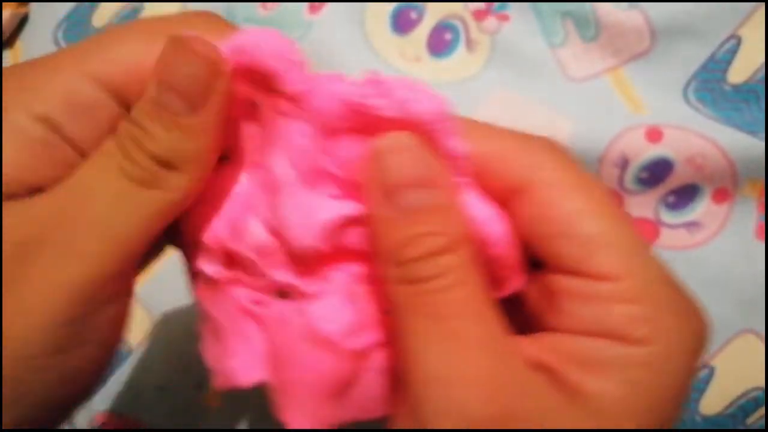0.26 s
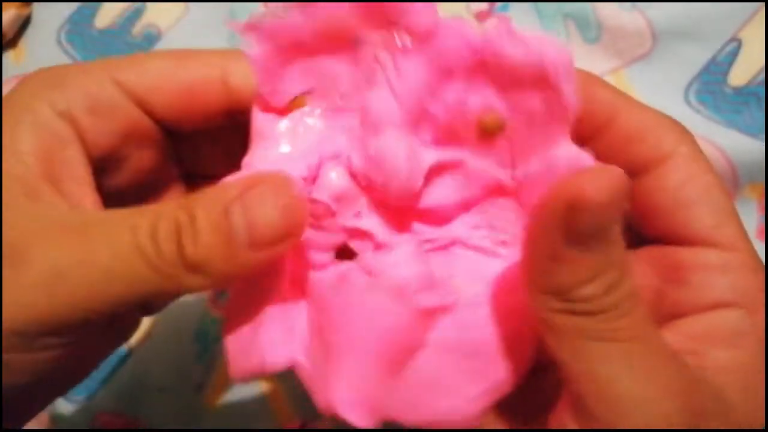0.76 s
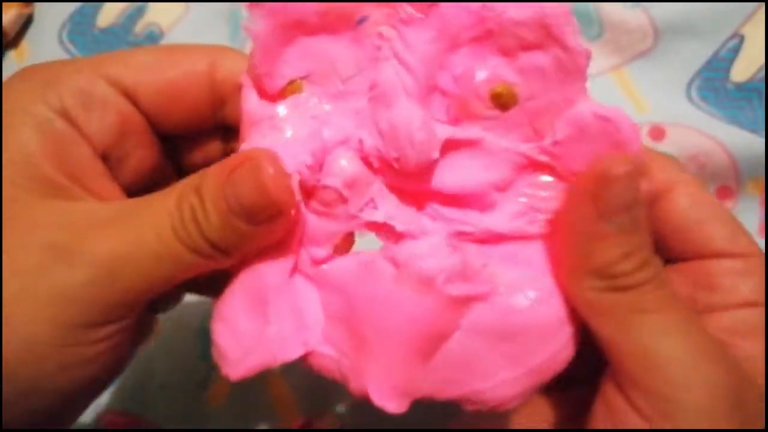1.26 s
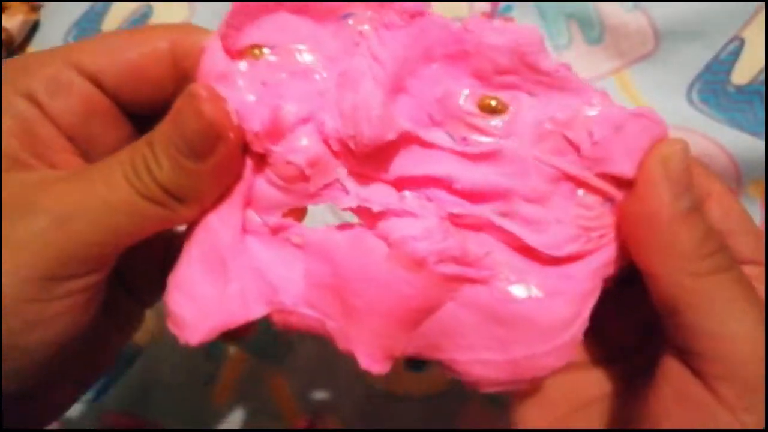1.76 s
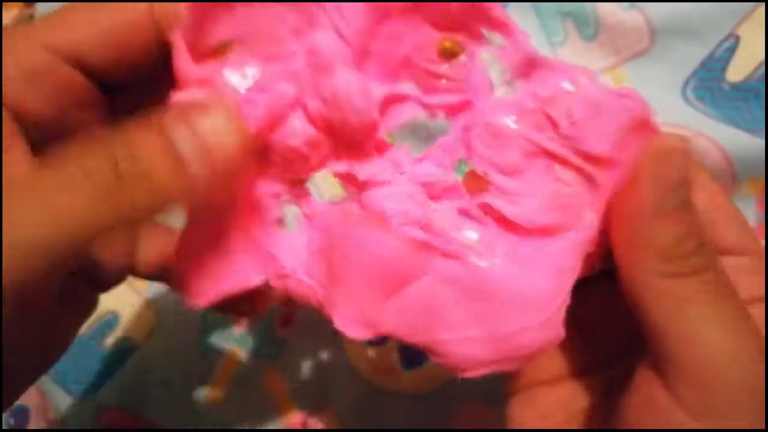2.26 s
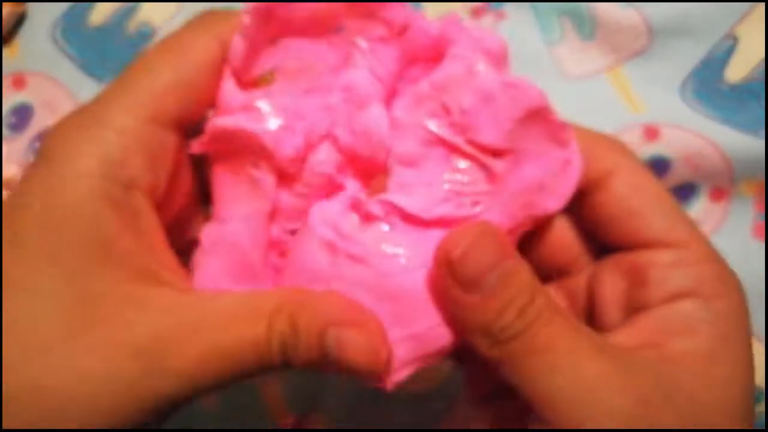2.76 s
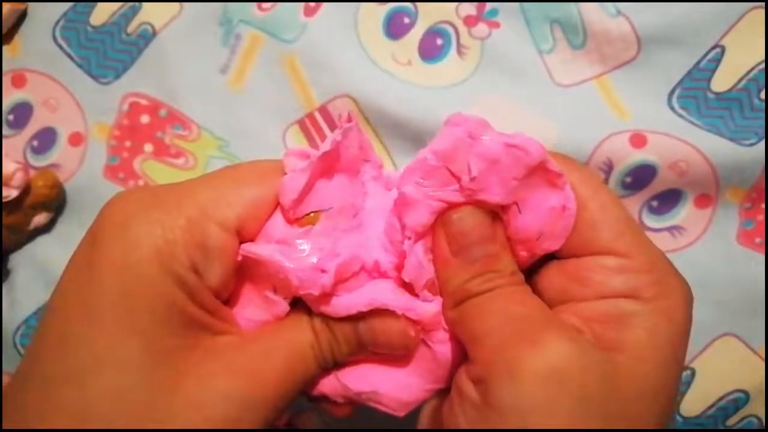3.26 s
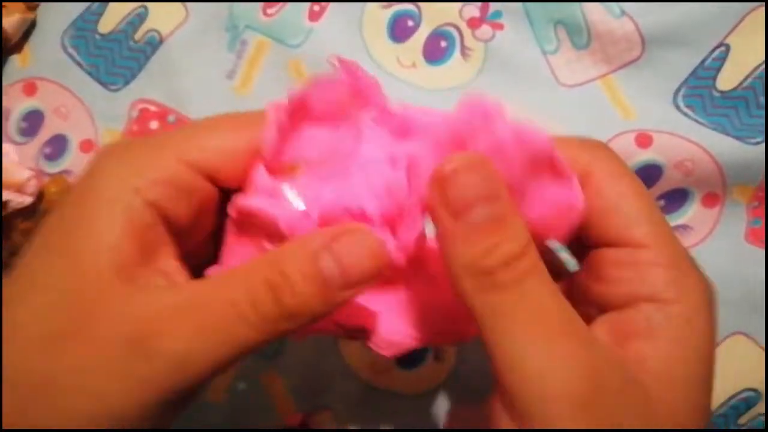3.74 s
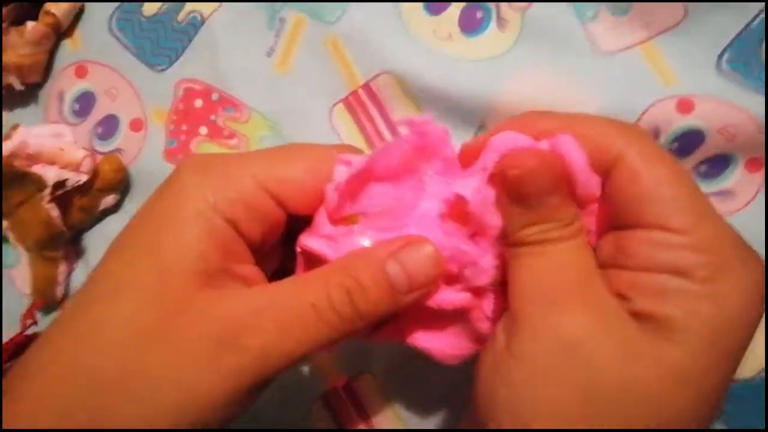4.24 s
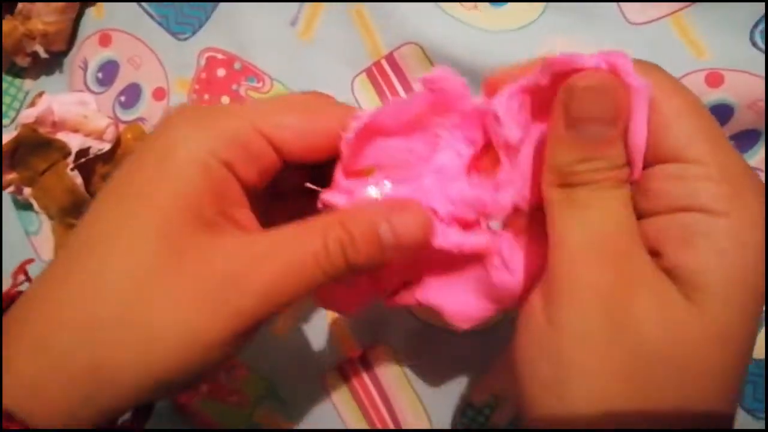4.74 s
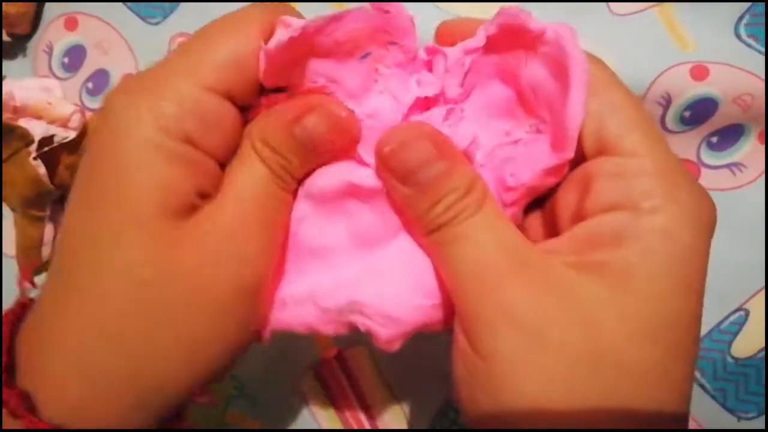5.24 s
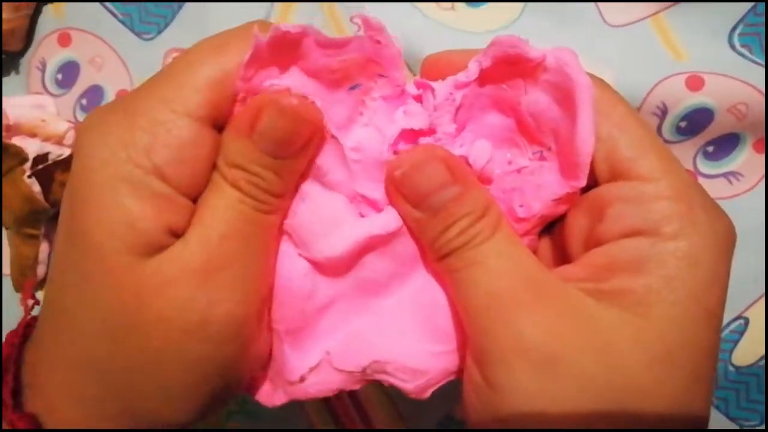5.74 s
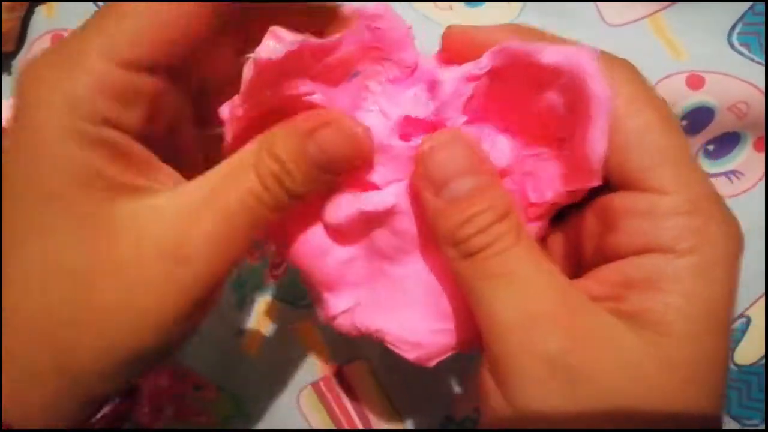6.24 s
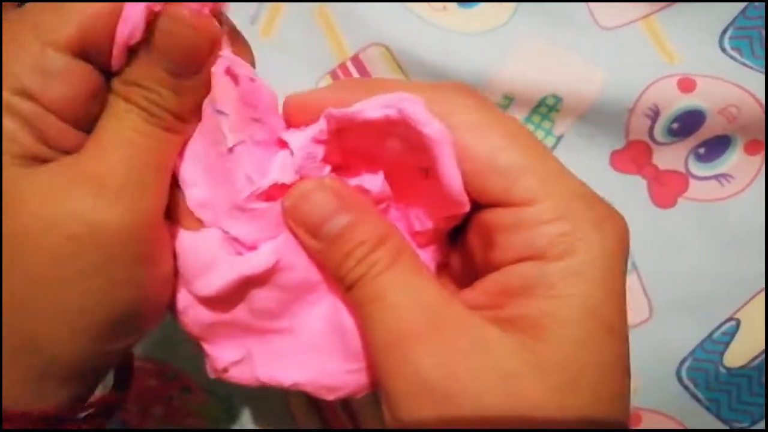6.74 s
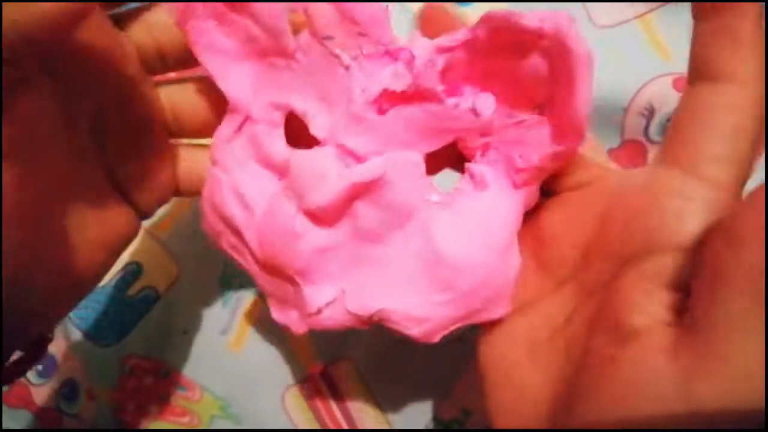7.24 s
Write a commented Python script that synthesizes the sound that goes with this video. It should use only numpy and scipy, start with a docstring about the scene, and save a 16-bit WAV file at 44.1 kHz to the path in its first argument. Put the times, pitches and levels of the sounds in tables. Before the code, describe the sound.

Hands tug and squeeze soft clay with a dried crust, giving sharp tiny snaps and short bursts of dry crackle, very close in a quiet room.

```python
"""Two hands pull and squeeze soft clay with a dried crust, close to a pair of small microphones in a quiet room.
Single snaps are tiny noise bursts that ring each microphone port near 8 kHz and a hollow in the clay.
Clumped random cracks make the dense crackle of each pull; a few soft low jolts mark a sticky seam letting go.
The table top sends back an early echo with a short tail; under it all lie room rumble and microphone hiss,
made of noise in half-octave bands."""
import sys
import numpy as np
from scipy import signal
from scipy.io import wavfile

SR = 44100
rng = np.random.default_rng(int(sys.argv[2]) if len(sys.argv) > 2 else 0)


def inscribe(sig):
    """Save sig as 16-bit PCM at rate SR to the path in sys.argv[1].

    A 1-D sig is mono; a 2-D sig holds one channel per row.
    Samples are clipped to [-1, 1] before scaling.
    """
    pcm = np.round(np.clip(np.atleast_2d(sig).T, -1, 1) * 32767)
    wavfile.write(sys.argv[1], SR, pcm.astype(np.int16))


def gain_from_decibels(decibels):
    """Convert decibel values to linear amplitude factors."""
    exponent = np.asarray(decibels, float) / 20
    return 10 ** exponent


N = 330564

# Room rumble and microphone hiss. Each row: frequency in Hz, relative noise density in dB per Hz.
ROOM_TONE = [(21, -21), (36, -5.5), (75, -11.5), (105, -6.5), (220, -13), (263, -19.5), (1130, -23.5),
             (1280, -18.5), (2190, -25), (8670, -30), (16000, -38.5)]
# How alike the room is at both microphones. Each row: frequency in Hz, left-right correlation (-1 to 1).
ROOM_LIKENESS = [(60, .96), (130, .9), (290, .2), (640, -.3), (1400, 0)]
# The microphone ports, left then right. Each row: ring in Hz, ring width in Hz, skirt width in Hz.
MIC_PORTS = [(7796, 2900, 1400), (8080, 1700, 1600)]
# Pulls and squeezes that tear the crust. Each row: peak time in seconds, length in seconds, fine cracks in dB,
# coarse cracks over fine in dB, coarse brightness in dB per octave over that of the held clay.
CRUST_PULLS = [(0.184, 0.07, -52.5, -3, 2), (0.222, 0.13, -43.5, -10, 0), (0.254, 0.07, -40, -4, -1),
               (0.288, 0.035, -39.5, 2.5, -4), (0.461, 0.068, -61, -1.5, -8.5), (0.744, 0.036, -57, 0, -7),
               (1.338, 0.13, -56, -6, -3), (1.444, 0.38, -73.5, -2, -1), (1.724, 0.03, -46.5, -13, 14),
               (1.767, 0.11, -49.5, -2, -1), (2.192, 0.11, -57.5, -12, -4), (2.25, 0.13, -59.5, -7, -3),
               (2.313, 0.09, -50.5, -6, -4), (2.602, 0.08, -67, -16, 6), (2.984, 0.38, -61, -8, -1),
               (3.11, 0.051, -58, -1.5, -3), (3.33, 0.87, -69.5, -2, -6), (3.536, 0.063, -35, -1.5, -2.5),
               (3.616, 0.16, -56, -5.5, -6), (3.988, 0.051, -56, -10, 0), (4.203, 0.078, -55.5, -3, -1),
               (4.3, 0.69, -65, -6.5, 1), (4.398, 0.035, -58.5, 8, 19), (4.596, 0.26, -64, -3, -9.5),
               (4.699, 0.21, -51, -8, -2), (4.749, 0.13, -53, -15, -14), (4.885, 0.047, -44, 0, -6),
               (5.03, 0.076, -54.5, -19, 2.1), (5.195, 0.31, -59, -2.7, 0.9), (5.269, 0.082, -61, 12, 5.5),
               (5.294, 0.03, -54, 7, 7.5), (5.333, 0.027, -39, -8, -1.5), (5.37, 0.14, -44.5, -10.5, -1),
               (5.459, 0.079, -46, -13.5, -3), (5.933, 0.13, -44, -7.5, -4.5),
               (5.957, 0.058, -38, -5.5, -6.5), (5.979, 0.03, -32.5, -3, -3), (6.014, 0.09, -48, -3, -3.5),
               (6.054, 0.04, -42.5, -1.5, -4), (6.092, 0.04, -56, -5, -10), (6.277, 0.047, -66, 7, 5),
               (6.58, 0.66, -62, -20, 9), (6.651, 0.24, -61.5, -0.5, -1.5), (6.943, 0.077, -57.5, 0, 1),
               (6.99, 0.13, -42, -5.5, -4.7), (7.065, 0.098, -44.5, -5.5, -6),
               (7.447, 0.037, -56, -18, 2.5)]
# Cracks while the clay is only held: fine level in dB, coarse level in dB.
HELD_DB = (-77.5, -78)
# Single snaps of the crust. Each row: start in seconds, peak at the port ring in dB, hollow pitch in Hz,
# hollow over that peak in dB, left over right in dB (a snap uses at most 16 either way).
CRUST_SNAPS = [(0.1009, -47, 1890.0, 7.5, 7), (0.1762, -43, 3920.0, 0, 4.5), (0.2018, -38, 4480.0, -5, 10),
               (0.2085, -37, 3800.0, -12.0, 8), (0.2137, -39, 3400.0, -11, 4),
               (0.2236, -41, 3830.0, -2, 9.5), (0.2465, -21, 4610.0, -15, 10.5),
               (0.2581, -36.5, 1460.0, -2, 11), (0.2657, -37, 4570.0, 0, 12.5),
               (0.2773, -34, 4740.0, 3, 12), (0.2852, -44, 5170.0, 9, 4), (0.2896, -34, 5080.0, 1.5, 8),
               (0.2958, -28.5, 3490.0, 4.5, 7), (0.4748, -35.5, 2450.0, -19, -8.5),
               (0.499, -55, 1450, 7.5, -9), (0.5097, -34.5, 5040.0, -27, 2), (0.735, -42.5, 1460.0, -3, 16),
               (0.7507, -32.5, 4130.0, -13, -8), (0.981, -32, 2370.0, -20.5, -3),
               (1.001, -44.5, 1200.0, -7, 1), (1.2522, -35, 4520.0, -23, 0.5),
               (1.2727, -34.5, 1940.0, -22, 0.0), (1.2828, -35, 4610.0, -21.0, 1.5),
               (1.2922, -27.5, 4520.0, -22, -1.0), (1.3036, -35, 4570.0, -15, -3),
               (1.3201, -30, 4440.0, -25.0, 4), (1.3338, -25.5, 1720.0, -11.5, 1),
               (1.3442, -25.5, 5300.0, -20, 1), (1.354, -37, 2980.0, -17, 3),
               (1.4432, -48.0, 1850.0, -13, 10), (1.5617, -34, 3270.0, -13.5, -8),
               (1.5755, -45, 4870.0, -10.5, -10.5), (1.6366, -30, 1680.0, -22, 4.5),
               (1.7064, -10, 3530.0, -15.5, -9.0), (1.7347, -31, 2800.0, -14, 3),
               (1.739, -13.5, 2710.0, -12.5, -11.5), (1.7536, -10.5, 2630.0, -14.5, -6),
               (1.7539, -45, 750, 3.5, 10), (1.7779, -36, 2890.0, -4, -12), (1.7849, -23, 4690.0, -3.5, -7),
               (1.8049, -45.0, 2330.0, -12, -16.0), (1.8247, -30, 2370.0, -19, -7),
               (2.2423, -43, 5210.0, -12, -7), (2.3114, -41, 2040, 4, -4), (2.3117, -26, 4390.0, -13, 7),
               (2.9049, -48, 5300.0, -1, -12), (2.914, -41.5, 3060.0, -19, -9),
               (2.9587, -39, 3190.0, -20, -10), (3.0834, -24, 5300.0, -13, 3.0),
               (3.0961, -17.5, 2500.0, -14, -4.5), (3.2933, -43, 5300.0, -13, 10),
               (3.5151, -35, 2670.0, -19, -11), (3.529, -16, 4350.0, -10, -8),
               (3.5397, -22, 1030.0, -5.5, 4), (3.5471, -31.0, 3000.0, -14.0, -4),
               (3.5515, -34, 4910.0, -3.5, 2.5), (3.5668, -33, 3880.0, -7, -7),
               (3.5831, -37.5, 5040.0, -11.0, -13), (3.6881, -40.5, 5040.0, -5, 2),
               (3.7086, -45.5, 2280.0, -3.5, 7), (4.1856, -43, 5000.0, -16, 10),
               (4.291, -31.5, 4390.0, -3, -12), (4.3166, -41.5, 2840.0, -22, -17),
               (4.3854, -27.5, 5170.0, -3, -16), (4.3954, -36, 5210.0, -9.5, -4),
               (4.3991, -44, 5170.0, -15, 2), (4.4182, -35, 4910.0, 0, -10), (4.4646, -43.5, 2630.0, -7, 8),
               (4.486, -39, 4220.0, -8, 9), (4.5732, -39.0, 780.0, -16, -4),
               (4.5863, -38.5, 4180.0, -8, -8), (4.6644, -39, 2710.0, -8.5, 10),
               (4.7504, -51.5, 1120.0, 4.5, 2), (4.8675, -42.5, 1160.0, 8, 0),
               (4.8762, -32, 2020, -6, -2.0), (4.8809, -30, 4880, -12, -7),
               (4.8847, -25.5, 860.0, -7.5, 8.5), (4.8932, -29, 2200.0, 1, -2),
               (5.0132, -23, 5300.0, -32, 10.5), (5.0928, -39, 4610.0, -16, 3),
               (5.1136, -46, 5040.0, -5, 9.0), (5.1264, -61, 860.0, 8, 6), (5.1584, -39.5, 5000.0, -18, 10),
               (5.2344, -32, 4260.0, -18, 7), (5.246, -39.5, 4570.0, 0, 2), (5.2618, -44, 4520.0, -2, 1),
               (5.2654, -32.5, 4910.0, 5.5, 4), (5.2813, -40, 4870.0, -12.0, 15),
               (5.3201, -5.5, 4520.0, -12.5, 7.5), (5.3231, -30, 4350.0, -15, -12.5),
               (5.3298, -39, 5300.0, -16.5, -1), (5.349, -3.5, 4390.0, -17, 5.5),
               (5.3576, -27, 5300.0, -12, 13.5), (5.3666, -32.0, 4820.0, -12, 5),
               (5.3779, -36.5, 5300.0, -11.5, 16), (5.395, -31.5, 5300.0, -18.0, 10),
               (5.4063, -18.5, 4820.0, -12, 7.5), (5.4428, -17.5, 4310.0, -16, 8.5),
               (5.4493, -28, 3320.0, -24, 2), (5.6217, -41, 820.0, -16, -4),
               (5.8462, -36.5, 2630.0, -16, 8), (5.8847, -41, 3360.0, -14.5, 8.0),
               (5.8944, -46.5, 1080.0, 5, 15), (5.9036, -27.5, 900.0, 0.5, 4.5),
               (5.9619, -19, 860.0, -12.5, 12), (5.9811, -29, 5300.0, -9.5, -2.5),
               (5.9908, -16.5, 1980.0, 3, 2.5), (6.0174, -34, 900.0, -11, 4.5),
               (6.0495, -36.5, 3230.0, -0.5, -9), (6.0859, -35.5, 2500.0, -14, 10),
               (6.2661, -40.5, 5300.0, -14, -2), (6.4107, -34.5, 3920.0, -19, -9),
               (6.4691, -42.5, 2370.0, 0, 8), (6.5219, -45.5, 5040.0, -7, 5.0),
               (6.5796, -30.5, 3230.0, -15, 0), (6.614, -41.0, 5000.0, -16.0, 5.0),
               (6.6425, -32, 4180.0, -14, 4.5), (6.6576, -31.5, 4690.0, -16, 11),
               (6.6669, -30.5, 5080.0, -11, 1), (6.6943, -52, 2330.0, 4, -3),
               (6.9334, -54.5, 2540.0, 17, 4), (6.9739, -19, 2500.0, -16, 0.5),
               (6.9762, -22, 4310.0, -15, -5), (6.9939, -28.0, 2580.0, -11, 1),
               (7.0238, -35, 2370.0, -22, 5), (7.0585, -41, 2280.0, 4, 14),
               (7.0713, -41, 5210.0, -1.5, -2.5), (7.086, -33, 4530.0, -12.0, 0.0)]
# The hands drift sideways. Each row: time in seconds, lag of a snap at the right microphone in ms.
HAND_LAGS = [(0.0, 0.44), (0.35, 0.089), (0.7, 0.0003), (1.7, 0.096), (3.3, -0.041), (4.5, 0.12),
             (5.3, 0.25), (7.5, 0.29)]
# The lump jolts as a sticky seam lets go. Each row: start in seconds, peak in dB, pitch in Hz.
SEAM_JOLTS = [(0.288, -47, 188), (4.882, -47, 116), (5.99, -38, 230)]


def in_time(rows):
    """Joins each column by straight lines, sample by sample."""
    s, *columns = np.transpose(rows)
    return [np.interp(np.arange(N) / SR, s, column) for column in columns]


def at_hz(points, hz):
    """Reads a table on a log-frequency axis."""
    table_hz, values = np.transpose(points)
    return np.interp(np.log(hz), np.log(table_hz), values)


def rms_one(x):
    """Scales to unit rms."""
    return x / np.sqrt(np.mean(x ** 2) + 1e-20)


def band(x, low_hz, high_hz):
    """Butterworth band-pass."""
    sos = signal.butter(2, [low_hz, min(high_hz, .48 * SR)], "band", fs=SR, output="sos")
    return signal.sosfilt(sos, x)


def resonance(x, hz, width_hz):
    """Two-pole resonance with gain 1 on top."""
    r = np.exp(-np.pi * width_hz / SR)
    zeros = np.array([1, 0, -1]) * (1 - r * r) / 2
    poles = [1, -2 * r * np.cos(2 * np.pi * hz / SR), r * r]
    return signal.lfilter(zeros, poles, x + 1e-18)


def sides(pan_db):
    """Left and right gains for a left-right difference in dB."""
    return gain_from_decibels(np.array([pan_db / 2, -pan_db / 2]))


def drift(knots_per_s):
    """Slow chance with spread 1: random knots joined by straight lines."""
    knots = rng.standard_normal(1200)
    line = np.interp(np.arange(N) / SR * knots_per_s, np.arange(len(knots)), knots)
    return line * np.sqrt(1.5)   # makes up for the spread lost between knots


def room(level_db=-65.5, waver_db=1.0):
    """Half-octave bands of rumble and hiss, most alike on both sides in the bass, where the level wavers."""
    out, edges = 0, 22 * 2 ** np.arange(0, 10.1, .5)
    white = rng.standard_normal((2, 2, N + 8192))
    for k, (low, high) in enumerate(zip(edges, edges[1:])):
        # neighbouring bands draw on separate noise; the filter's start is thrown away
        mid, side = band(white[k % 2], low, high)[:, 8192:]
        hz = np.sqrt(low * high)
        alike = np.clip(at_hz(ROOM_LIKENESS, hz), -1, 1)
        gain = gain_from_decibels(at_hz(ROOM_TONE, hz) + waver_db * drift(2.5) * (hz < 400))
        out = out + gain * (np.sqrt(1 + alike) * mid + np.sqrt(1 - alike) * side * [[1], [-1]])
    return gain_from_decibels(level_db) * rms_one(out)


def ports(x):
    """Each microphone port rings as a small cavity and rolls off above 12 kHz."""
    rung = []
    for side, (hz, ring_hz, skirt_hz) in zip(x, MIC_PORTS):
        rung.append(resonance(resonance(side, hz, ring_hz), hz, skirt_hz))
    return signal.sosfilt(signal.butter(2, 12000, fs=SR, output="sos"), rung)


def effort(rise_share=0.42, edge_db=17.5):
    """Pulls swell and fade evenly in dB; their powers add, and brightness is the mean weighted by coarse power."""
    t = np.arange(0, N, 32) / SR
    rest_fine, rest_coarse = gain_from_decibels(2 * np.array(HELD_DB))   # as power
    s, length, fine_db, coarse_db, tilt_db = np.transpose(CRUST_PULLS)[..., None]
    # 1 at either end of a pull, where it lies edge_db under its peak; the slopes run on beyond
    away = np.maximum((s - t) / rise_share, (t - s) / (1 - rise_share)) / length
    fine = gain_from_decibels(2 * (fine_db - edge_db * away))
    coarse = fine * gain_from_decibels(2 * coarse_db)
    fine_sum = fine.sum(axis=0) + rest_fine
    coarse_sum = coarse.sum(axis=0) + rest_coarse
    tilt = (coarse * tilt_db).sum(axis=0) / coarse_sum
    return in_time(np.transpose([t, 10 * np.log10(fine_sum), 10 * np.log10(coarse_sum), tilt]))


def grains(per_s, spread_db, clump_db, right_lag_ms=0.2):
    """Random tiny cracks in clumps, larger where sparse; each side also hears scattered ones of its own."""
    born = rng.random((3, N)) < per_s * gain_from_decibels(clump_db * drift(140.)) / SR
    sizes = gain_from_decibels(spread_db * np.minimum(rng.exponential(1, (3, N)), 4))
    sizes = sizes * rng.choice([-1, 1], (3, N))
    shared, left, right = born * sizes / np.sqrt(per_s)
    late = np.roll(shared, round(right_lag_ms / 1000 * SR))   # shared cracks reach the right a little late
    return np.array([shared + 2.1 * left, late + 1.3 * right])


def fine_cracks(fine_db):
    """Fine cracks ring the ports, and the finest also hiss above that ring."""
    # a gentle pull gives lone ticks, a hard one a dense sizzle
    per_s = np.clip(4000 * gain_from_decibels(1.2 * (fine_db + 47)), 100, 4000)
    small = grains(per_s, spread_db=4.0, clump_db=6.5)
    air = gain_from_decibels(-30) * band(small, 10500, 15400)
    return gain_from_decibels(fine_db) * np.array([rms_one(side) for side in ports(small) + air])


def coarse_cracks(coarse_db, tilt_db):
    """Coarser cracks are dealt among nine pitches, each a broad resonance of an opening pocket."""
    cracks = grains(per_s=4000., spread_db=4.0, clump_db=6.0)
    dealt = rng.integers(0, 9, N)
    coarse, power = 0, 0
    for k, hz in enumerate(np.geomspace(650, 5400, 9)):
        share = gain_from_decibels((tilt_db + 8.0) * np.log2(hz / 2500))   # held clay leans up 8 dB per octave
        rung = resonance(resonance(cracks * (dealt == k), hz, 0.46 * hz), hz, 0.26 * hz)
        coarse = coarse + share * rms_one(rung)
        power = power + share ** 2
    return gain_from_decibels(coarse_db) * coarse / np.sqrt(power)


def crackle():
    """Fine and coarse cracks follow the pulls, leaning slightly to where the crust is breaking."""
    fine_db, coarse_db, tilt_db = effort()
    pan_db = 0.063 * in_time(CRUST_SNAPS)[3]
    return sides(pan_db) * (fine_cracks(fine_db) + coarse_cracks(coarse_db, tilt_db))


def echoes(x, echo_ms=1.7, echo_db=-20, scatter_db=-24, scatter_t60=0.011):
    """Adds one near reflection from the table top, then a short scattered tail (60 dB decay in seconds)."""
    lag, t = round(echo_ms / 1000 * SR), np.arange(4096) / SR
    tail = rng.standard_normal((2, 4096)) * gain_from_decibels(-60 * t / scatter_t60) * (t > .002)
    tail *= gain_from_decibels(scatter_db) / np.sqrt(np.sum(tail ** 2, axis=1, keepdims=True))
    tail[:, lag] += gain_from_decibels(echo_db)
    return x + signal.fftconvolve(x, tail, axes=1)[:, :N]


def port_snaps(t, break_ms=0.12):
    """Each break is a noise burst, with a rattle scattered by fingers and folds, heard through the ports."""
    count = len(CRUST_SNAPS)
    burst = rng.standard_normal((count, len(t))) + 1.96 * (t == 0)
    burst = burst * np.exp(-t / (break_ms / 1000))
    rattle = rng.standard_normal((2, count, len(t))) * np.exp(-t / 0.0015)
    rattle_gain = gain_from_decibels(np.array([[[-25]], [[-21]]]))   # stronger on the shaded right side
    heard = ports(burst + rattle_gain * rattle)
    return heard / peaks(heard)


def peaks(x):
    """The peak of each snap on each side."""
    return np.abs(x).max(axis=2, keepdims=True)


def pocket(hz, t):
    """A ring that swells in its first half cycle; wide, low hollows are soft-walled and die in fewer cycles."""
    turns = hz * t
    cycles = 15 * np.sqrt(hz / 3000)   # to fall by 60 dB
    return np.sin(2 * np.pi * turns) * gain_from_decibels(-60 * turns / cycles) * (1 - np.exp(-3.0 * turns))


def hollows(hollow_hz, t, neighbour_db=-7, ladder_top_hz=9681.36):
    """A hollow in the clay rings, and four neighbours join in on a ladder from just under its pitch."""
    hollow = pocket(hollow_hz, t)
    rungs = (np.arange(4) + rng.random((len(hollow_hz), 4))) / 4
    lowest_hz = 0.84 * hollow_hz
    for k in range(4):
        hz = lowest_hz * (ladder_top_hz / lowest_hz) ** rungs[:, k:k + 1]
        right_sign = -1 if k == 2 else 1   # one neighbour is inverted on the right
        hollow = hollow + gain_from_decibels(neighbour_db) * pocket(hz, t) * [[[1]], [[right_sign]]]
    return hollow / peaks(hollow)


def snaps(lean_db=0.5):
    """Each snap sums a port ring and a hollow, placed by level and by its lag at the right microphone."""
    s, peak_db, hollow_hz, hollow_db, pan_db = np.transpose(CRUST_SNAPS)[..., None]
    lag_ms = np.interp(s, *np.transpose(HAND_LAGS))
    t = np.arange(512) / SR
    pan_db = np.clip(pan_db, -16, 16)
    ring = sides(pan_db) * port_snaps(t)
    hollow = gain_from_decibels(hollow_db) * sides(0.92 * pan_db + lean_db) * hollows(hollow_hz, t)
    shapes = gain_from_decibels(peak_db) * (ring + hollow)
    out = np.zeros((2, N + 1024))
    for side, start in enumerate([s, s + lag_ms / 1000]):
        np.add.at(out[side], np.round(start * SR).astype(int) + np.arange(512), shapes[side])
    return out[:, :N]


def jolts(t60=0.031, rise_ms=0.23):
    """A soft low swing, decaying 60 dB in t60 seconds, that both sides feel alike."""
    out, t = np.zeros(N), np.arange(4096) / SR
    for s, peak_db, hz in SEAM_JOLTS:
        swing = np.sin(2 * np.pi * hz * t) * gain_from_decibels(-60 * t / t60) * (1 - np.exp(-t / (rise_ms / 1000)))
        out[round(s * SR):][:4096] += gain_from_decibels(peak_db) * swing / np.abs(swing).max()
    return out


def scene():
    """Snaps and crackle with their echoes, the jolts, and the room under them."""
    clay = snaps() + crackle()
    return echoes(clay) + jolts() + room()


def band_limit(x):
    """A steep low-pass at the top of the band."""
    return signal.sosfilt(signal.butter(12, 16690, fs=SR, output="sos"), x)


def record(dry):
    """A steep low-pass takes off the top, 60 dB down from 16.8 kHz."""
    mix = signal.sosfilt(signal.cheby2(10, 60, 16800, fs=SR, output="sos"), dry)
    return band_limit(mix)


dry = scene()
out = record(dry)
inscribe(out)
```